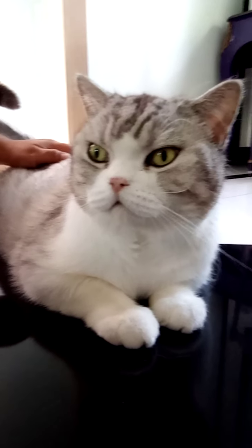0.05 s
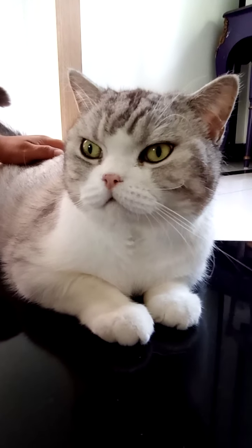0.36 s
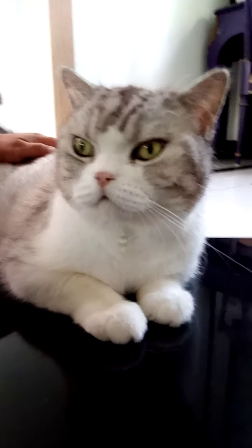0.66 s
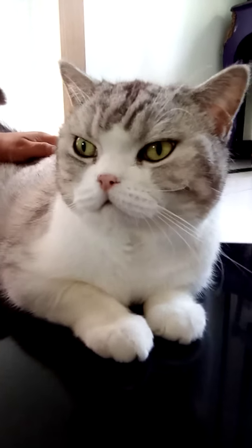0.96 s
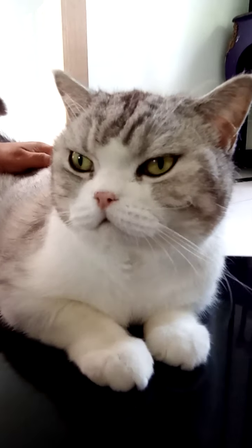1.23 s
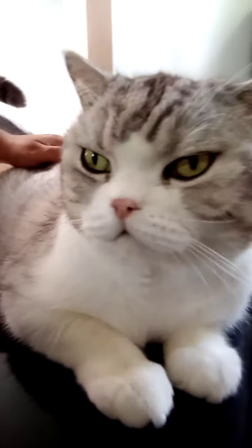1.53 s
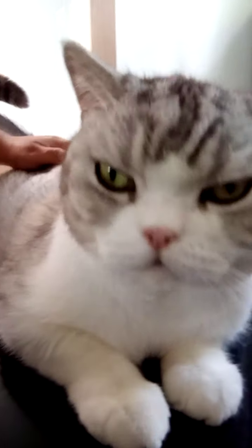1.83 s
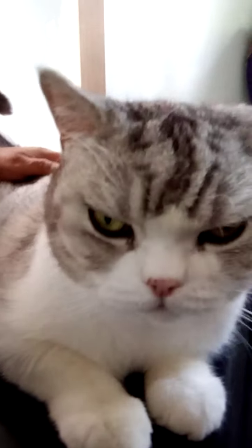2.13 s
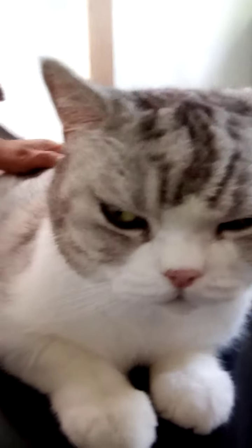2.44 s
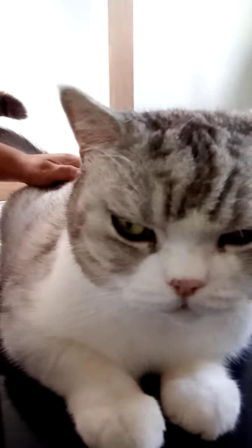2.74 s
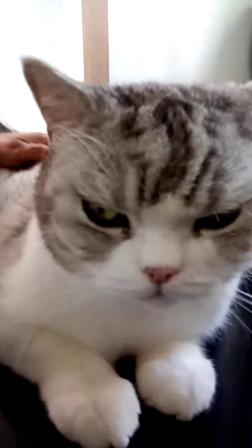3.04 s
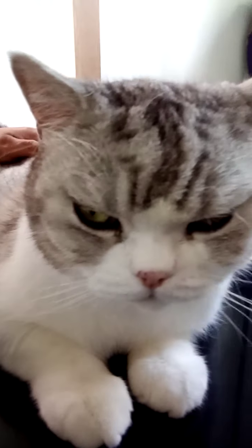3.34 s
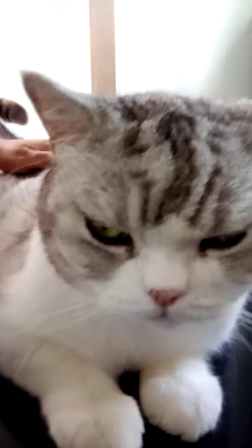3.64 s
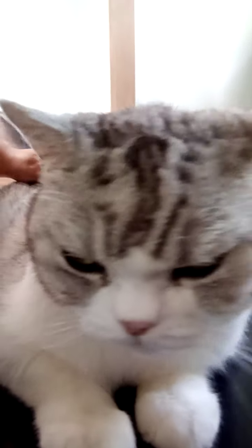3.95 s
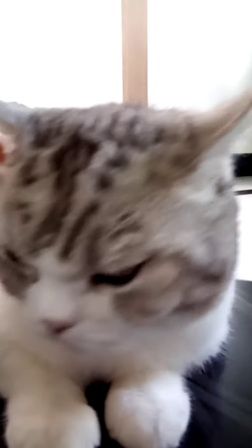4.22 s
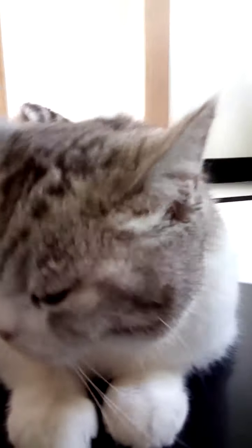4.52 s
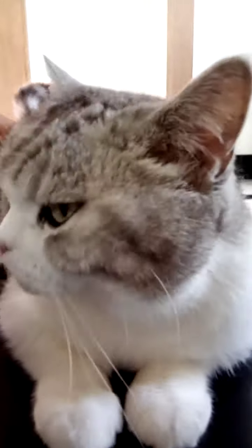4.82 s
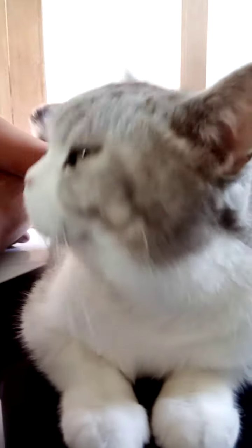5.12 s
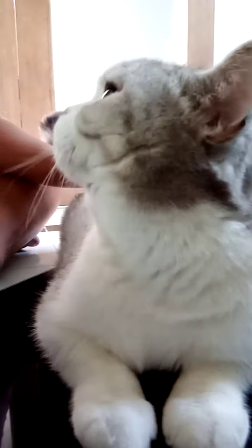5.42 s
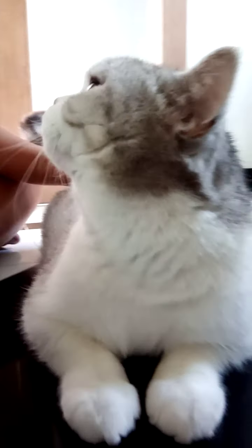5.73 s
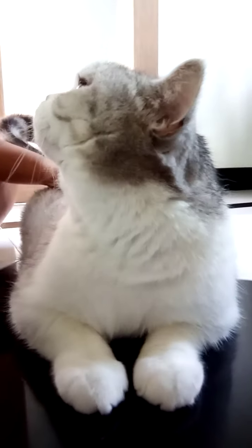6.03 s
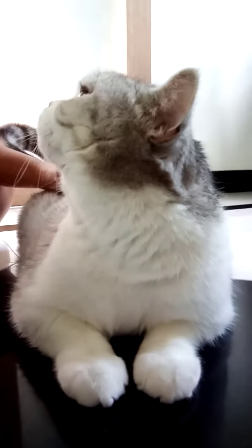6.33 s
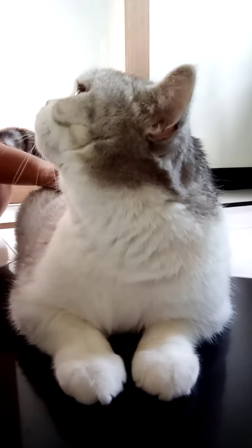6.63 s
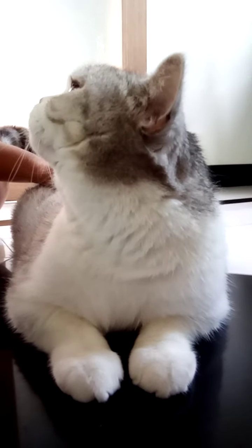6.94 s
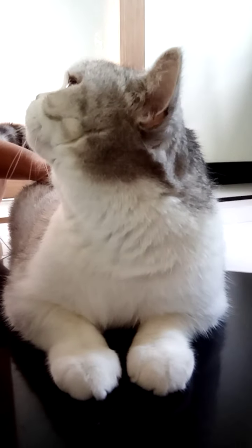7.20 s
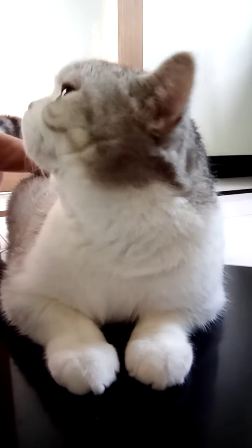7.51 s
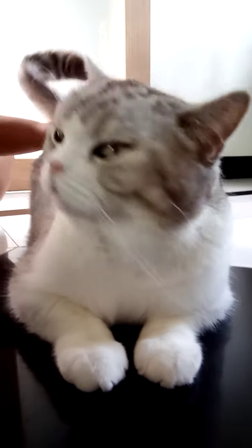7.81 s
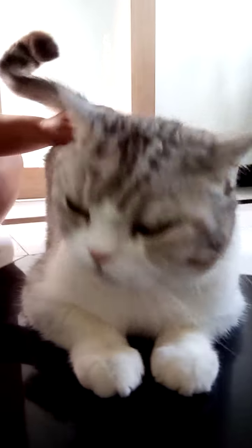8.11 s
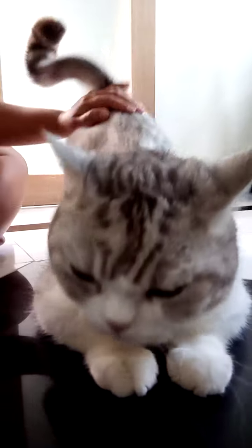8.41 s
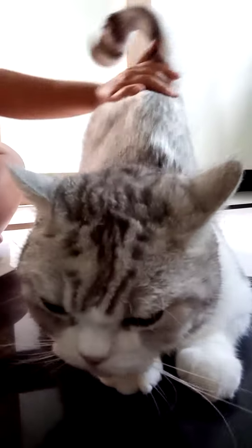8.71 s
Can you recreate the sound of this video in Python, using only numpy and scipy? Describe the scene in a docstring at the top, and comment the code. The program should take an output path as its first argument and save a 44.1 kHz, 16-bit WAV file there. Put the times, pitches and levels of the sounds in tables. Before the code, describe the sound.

Close hissing strokes over fur, with small clicks and bumps, cover a cat's faint purring and a brief run of whistling sniffs.

```python
"""In a quiet, faintly humming room a cat purrs in and out, with a pulsing nose hiss on each out-breath.
A hand starts stroking it, and fur and skin brush right against the right microphone port: each stroke
is a hiss of countless tiny slips, with sharp ticks and soft bumps where the contact catches.
Near 5.7 s the cat lifts its head and sniffs with a thin whistle, and purr and strokes pause.
From 7.7 s come one last light stroke and one more breath of purring."""
import sys
import numpy as np
from scipy import signal
from scipy.fft import rfft, irfft, next_fast_len
from scipy.io import wavfile

SR = 44100
rng = np.random.default_rng(int(sys.argv[2]) if len(sys.argv) > 2 else 0)


def store_pcm(level_fs):
    """Save levels as 16-bit WAV."""
    pcm = np.round(np.clip(level_fs, -1, 1) * 32767).astype(np.int16)
    wavfile.write(sys.argv[1], SR, np.atleast_2d(pcm).T)


N = 390726


def from_db(db):
    """Decibels to gain."""
    return 10 ** (np.asarray(db) / 20)


def rms_one(x):
    """Scale to an rms of 1."""
    return x / np.sqrt(np.mean(x ** 2) + 1e-20)


def seconds():
    """The time of every sample."""
    return np.arange(N) / SR


def at_hz(points, hz):
    """Read an EQ curve on a log-frequency axis."""
    point_hz, value = np.transpose(points)
    return np.interp(np.log(hz + 1), np.log(point_hz), value)


def equalise(x, gain):
    """Filter by a gain given as a function of frequency."""
    size = next_fast_len(N)
    hz = np.arange(size // 2 + 1) * SR / size
    return irfft(rfft(x, size) * gain(hz), size)[..., :N]


def drift(rate_hz):
    """Smooth random modulation with an rms of 1."""
    return rms_one(equalise(rng.standard_normal(N), lambda f: 1 / (1 + (f / rate_hz) ** 2)))


def resonate(x, hz, width_hz):
    """A two-pole resonance applied twice, for steep skirts; gain 1 at the peak."""
    r = np.exp(-np.pi * width_hz / SR)
    b = (1 - r * r) / 2 * np.array([1, 0, -1])
    a = [1, -2 * r * np.cos(2 * np.pi * hz / SR), r * r]
    return signal.lfilter(b, a, signal.lfilter(b, a, x + 1e-18))


def cavity(x, modes):
    """Parallel resonances with alternating polarity; rms 1."""
    rings = [(-1) ** k * from_db(db) * resonate(x, hz, width) for k, (hz, width, db) in enumerate(modes)]
    return rms_one(sum(rings))


def reverberate(x, t60_s, wet_db):
    """Direct sound plus a diffuse tail, unrelated at the two ports."""
    t = np.arange(SR // 2) / SR
    tails = rng.standard_normal((2, len(t))) * from_db(-60 * t / t60_s)
    tails *= from_db(wet_db) / np.sqrt(np.sum(tails ** 2, axis=1, keepdims=True))
    wet = signal.fftconvolve(x[None], tails, axes=1)[:, :N]
    return (x + wet) / np.sqrt(1 + from_db(wet_db) ** 2)


# EQ of the room tone: frequency_hz, gain_db
ROOM_EQ = [(25, -26.5), (52, -25), (75, -6.5), (95, -6.5), (125, -1.5), (220, -2), (400, -7.5), (600, -10),
           (1000, -14.5), (2000, -24.5), (4000, -31.5), (7000, -32.5), (13000, -49.5), (15300, -30.5)]
# Its lean to the right: frequency_hz, left_minus_right_db
ROOM_PAN = [(60, -7), (200, -7.5), (400, -11), (650, -18.5), (1300, -16), (2400, -6.5), (15000, -8.5)]
# Its width, mono in the bass and open above: frequency_hz, left_right_correlation
ROOM_CORRELATION = [(60, 1), (130, 0.82), (290, 0.67), (640, 0.22), (1400, 0), (3000, 0)]
def room_tone(level_db=-58.5, swell_db=2.4, hum_hz=94.5, hum_db=-70.5):
    """A soft, swelling rumble of air with a faint appliance hum, shared by both ports in the bass."""
    common, left_only = rng.standard_normal((2, N))
    right_eq = lambda f: from_db(at_hz(ROOM_EQ, f))
    left_eq = lambda f: right_eq(f) * from_db(at_hz(ROOM_PAN, f))
    alike = lambda f: at_hz(ROOM_CORRELATION, f)
    right = equalise(common, right_eq)
    left = equalise(common, lambda f: left_eq(f) * alike(f))
    left += equalise(left_only, lambda f: left_eq(f) * np.sqrt(1 - alike(f) ** 2))
    hum = from_db(hum_db) * np.sin(2 * np.pi * hum_hz * seconds() + drift(1.2))
    air = np.array([left, right]) / np.std(right) * from_db(level_db + swell_db * drift(5.3))
    return air + hum * from_db([[at_hz(ROOM_PAN, hum_hz)], [0]])


# Breaths of the purr, in and then out: start_s, turn_s, end_s, throat_db, nose_db
PURR_BREATHS = [(0.102, 0.78, 1.33, -63.5, -59), (1.448, 2.124, 2.67, -60, -57.5),
                (2.758, 3.5, 4.0, -60, -59), (4.099, 4.794, 5.2, -60.5, -63),
                (5.299, 5.753, 6.1, -64.5, -59), (7.776, 8.298, 8.74, -62.5, -60.5)]
# Warm resonances of chest and throat: centre_hz, width_hz, gain_db
CHEST_MODES = [(92, 29, 2.5), (144, 66, 5.5), (236, 190, -2.5), (397, 107, 0.5), (804, 290, -15.5)]
# Airy resonances of the nose: centre_hz, width_hz, gain_db
NOSE_MODES = [(895, 780, -5), (1600, 510, -22), (2670, 700, 0.5), (3080, 1600, -5.5), (4560, 1600, -5),
              (5440, 910, -1), (7730, 1200, -24.5)]
def purr(in_pulse_hz=24.2, out_pulse_hz=26.0, rest_s=0.1, fade_s=0.053, uneven_db=2.3,
         snap=29.0, puff_t60_s=0.04, click_db=-15, spurt_t60_s=0.038, steady_air=0.313):
    """Each opening of the glottis thumps the chest and, breathing out, spurts air through the nose."""
    throat, nose = np.zeros((2, N))
    halves = []
    for start, turn, end, throat_db, nose_db in PURR_BREATHS:
        # breathing in, the nose is almost silent; breathing out, the throat is softer
        halves.append((start, turn - rest_s - start, in_pulse_hz, throat_db, nose_db - 32))
        halves.append((turn, end - turn, out_pulse_hz, throat_db - 3, nose_db))
    for start, length, pulse_hz, throat_db, nose_db in halves:
        t = np.arange(int(length * SR)) / SR
        span = slice(int(start * SR), int(start * SR) + len(t))
        pulse = (t * pulse_hz).astype(int)
        since_opening = t - pulse / pulse_hz
        openings = np.diff(pulse, prepend=0)
        strength = from_db(uneven_db * rng.standard_normal(SR // 100))[pulse]
        fade = np.clip(np.minimum(t, length - t) / fade_s, 0, 1)
        throat_air, nose_air = rng.standard_normal((2, SR))[:, :len(t)]
        # each puff dies before the next, so the pulses stay distinct
        thumps = snap * openings + throat_air * from_db(-60 * since_opening / puff_t60_s)
        spurts = nose_air * (steady_air + strength * from_db(-60 * since_opening / spurt_t60_s))
        clicks = rms_one(resonate(openings * strength * fade, hz=648, width_hz=1000))
        chest = cavity(thumps * strength * fade, CHEST_MODES)
        throat[span] += from_db(throat_db) * (chest + from_db(click_db) * clicks)
        nose[span] += from_db(nose_db) * cavity(spurts * fade, NOSE_MODES)
    return throat, nose


# Partials of the nose whistle: harmonic_number, gain_db
WHISTLE_PARTIALS = [(1, -3), (2, -8.5), (3, -17)]
def sniffs(start_s=5.706, count=9, every_s=0.1175, length_s=0.147, settle_s=0.33, fall=0.0345,
           rasp=0.058, shimmer_db=5.0, attack_s=0.0071, fade_db_per_s=34.0, uneven_db=4.7):
    """Each sniff whistles in the nose and sinks a little; turbulence makes the note harsh."""
    # the run starts low and hoarse, then settles: pitch_hz, level_db, roughness
    hoarse, settled = np.array([2830, -54, 1.03]), np.array([3080, -57, 0.49])
    out, waver, shimmer = np.zeros(N), drift(580), drift(270)
    t = np.arange(int(length_s * SR)) / SR
    envelope = np.minimum(t / attack_s, 1) * np.sqrt(1 - t / length_s) * from_db(-fade_db_per_s * t)
    for elapsed in every_s * np.arange(count):
        hz, db, roughness = settled + (hoarse - settled) * np.exp(-elapsed / settle_s)
        onset = int((start_s + elapsed) * SR)
        span = slice(onset, onset + len(t))
        pitch_hz = hz * (1 + fall * (.5 - t / length_s) + rasp * roughness * waver[span])
        phase = 2 * np.pi * np.cumsum(pitch_hz) / SR
        tone = sum(from_db(gain_db) * np.sin(round(k) * phase) for k, gain_db in WHISTLE_PARTIALS)
        whistle = rms_one(tone * envelope * from_db(shimmer_db * shimmer[span]))
        out[span] += from_db(db + uneven_db * rng.standard_normal()) * whistle
    return out


# Soft bumps and scuffs of the hand: start_s, level_db, centre_hz, t60_s
HAND_BUMPS = [(0.605, -46.5, 563, 0.055), (0.925, -54, 460, 0.077), (1.425, -43.5, 1700, 0.044),
              (1.683, -43.5, 1530, .05), (4.297, -45, 2054, 0.11), (5.768, -43.5, 500, 0.034),
              (5.768, -26, 6600, 0.019), (6.025, -51, 890, 0.18), (6.747, -35.5, 670, 0.0099),
              (8.02, -59.5, 62, .5)]
def bumps():
    """The hand nudges the housing: a short burst without a pitch."""
    out, t = np.zeros(N), np.arange(SR // 3) / SR
    for start_s, db, hz, t60_s in HAND_BUMPS:
        burst = rms_one(resonate(rng.standard_normal(len(t)), hz, width_hz=hz))
        onset = int(start_s * SR)
        out[onset:onset + len(t)] += from_db(db - 60 * t / t60_s) * burst
    return out


# Sharp catches of the contact: time_s, snap_db, fizz_over_snap_db
CATCHES = [(0.585, -48, 2), (0.5971, -35, 5), (0.6066, -35, -3), (0.611, -20, -5), (1.412, -25, -9),
           (2.781, -29, -19), (2.84, -36, -18), (3.2077, -18.5, -27.5), (3.512, -14.5, -32),
           (4.349, -17, -20), (4.4221, -19, -20), (5.057, -28, -22), (5.456, -23.5, -7), (6.608, -49, 32),
           (6.6152, -22, -26), (6.7475, -19.5, -20), (6.9582, -47.5, -14), (7.2473, -48, -7),
           (7.3569, -48, -7)]
# The port's four resonances (knock, body, snap, fizz): centre_hz, width_hz
PORT_MODES = [(1600, 1700), (3600, 3300), (7200, 3700), (15100, 1700)]
def ticks(trim_db=1.0, lead_s=0.00027, body_offset_db=-7.5, body_per_fizz=0.44, knock_offset_db=-6.0):
    """A catch is one click into the port's short resonances; more fizz brings more body."""
    time_s, snap_db, fizz_db = np.transpose(CATCHES)
    body_db = snap_db + body_offset_db + body_per_fizz * fizz_db
    peaks_db = [body_db + knock_offset_db, body_db, snap_db, snap_db + fizz_db]
    onsets = np.round((time_s - lead_s) * SR).astype(int)
    out = np.zeros(N)
    for k, ((hz, width_hz), peak_db) in enumerate(zip(PORT_MODES, peaks_db)):
        clicks = np.zeros(N)
        clicks[onsets] = from_db(peak_db + trim_db)
        ring_peak = np.abs(resonate(signal.unit_impulse(SR // 100), hz, width_hz)).max()
        out += (-1) ** k * resonate(clicks, hz, width_hz) / ring_peak
    return out


# One envelope per stroke, from landing to lift-off: time_s, hiss_db, fizz_over_hiss_db
STROKE_ENVELOPES = [
    [(0.722, -39.5, -5.5), (0.906, -35, -7.5), (1.182, -39.5, -4), (1.208, -35.5, -8.5),
     (1.526, -34.5, -4.5), (1.702, -37.5, -8), (1.858, -46.5, -6.5), (1.924, -43, -6), (2.208, -59.5, 2),
     (2.31, -60.5, 1)],
    [(2.375, -54, 2), (2.543, -51.5, -2), (2.573, -45.5, 0.5), (2.845, -51.5, -9), (2.869, -55.5, -12),
     (2.961, -51.5, -6), (2.97, -54.5, -6)],
    [(3.39, -51.5, -7), (3.45, -49.5, 0.5), (3.548, -39, -7), (3.702, -43.5, -8.5), (3.722, -46, -5),
     (4.126, -43, 1), (4.444, -46.5, 0.5), (4.546, -53, 1), (4.56, -54, -5)],
    [(4.655, -53.5, -3), (4.767, -44, -4), (4.843, -46, 1), (4.967, -47.5, -3), (4.975, -54, 6.5),
     (5.253, -61.5, 1.5), (5.27, -64, 3)],
    [(5.325, -48.5, -9), (5.381, -56, -6), (5.407, -45.5, -12), (5.505, -48, -5), (5.749, -37.5, -6),
     (5.811, -46, 2.5), (6.125, -53.5, 5.5), (6.165, -41, -8), (6.199, -39.5, -6), (6.229, -50, -6),
     (6.255, -48.5, -3)],
    [(7.722, -51.5, -6), (7.794, -48.5, -2.5), (8.082, -51, -2), (8.11, -55, 3.5), (8.296, -51.5, 2.5),
     (8.434, -54.5, 6.5), (8.692, -63.5, 4.5), (8.85, -60.5, 5)],
]
# Light grazes between the strokes, each one smooth swell: middle_s, length_s, hiss_db
GRAZE_SWELLS = [(0.062, 0.17, -64.5), (0.647, 0.16, -63.5), (3.255, 0.1, -64), (3.31, 0.088, -66),
                (6.807, 0.17, -76), (7.056, 0.3, -81), (7.3, 0.3, -84)]
def hand_contact(landing_s=0.038, lifting_s=0.066, graze_fizz_db=-13):
    """Envelopes of the hiss and its share of fizz, in dB: both follow the hand's speed and pressure."""
    t = seconds()
    hiss_power, fizz_power = 1e-14, 1e-16
    for stroke in STROKE_ENVELOPES:
        time_s, hiss_db, fizz_db = np.transpose(stroke)
        landing = np.clip(1 + (t - time_s[0]) / landing_s, 0, 1)
        lifting = np.clip(1 - (t - time_s[-1]) / lifting_s, 0, 1) ** 2
        hiss = landing * lifting * from_db(np.interp(t, time_s, hiss_db))
        hiss_power += hiss ** 2
        fizz_power += (hiss * from_db(np.interp(t, time_s, fizz_db))) ** 2
    for middle_s, length_s, hiss_db in GRAZE_SWELLS:
        hiss = from_db(hiss_db) * np.cos(np.pi * np.clip((t - middle_s) / length_s, -.5, .5)) ** 2
        hiss_power += hiss ** 2
        fizz_power += (hiss * from_db(graze_fizz_db)) ** 2
    return 10 * np.log10(hiss_power), 10 * np.log10(fizz_power / hiss_power)


# The colour that the port gives the rubbing, before its bands are balanced: frequency_hz, gain_db
PORT_EQ = [(330, -42.5), (450, -18.5), (580, -41.5), (1200, -26), (2000, -22.5), (3000, -15.5),
           (4000, -11.5), (5300, -7.5), (6600, -2.5), (7400, -0.5), (8700, -4.5), (10200, -6),
           (12000, -11.5), (13800, -13.5), (14700, -2), (15400, 0)]
def fur_rubbing(slips_per_s=24000, size_spread_db=4.0, flutter_db=0.06, grip_db=1.18, patchy_db=0.86,
                trim_db=4.5, ordinary_stroke_db=-47, port_top_hz=15550):
    """Hairs slip one by one; the port colours the dense clicks, and the contact shifts their balance."""
    hiss_db, fizz_db = hand_contact()
    sizes = from_db(size_spread_db * rng.standard_normal(N)) * rng.choice([-1, 1], N)
    slipping = rng.random(N) < slips_per_s / SR
    slips = sizes * slipping * from_db(flutter_db * drift(35) + grip_db * drift(8.9))
    # body rises with fizz, but pressing harder favours the hiss
    body_db = -8.5 + 0.4 * fizz_db - 0.25 * (hiss_db - ordinary_stroke_db)
    # a lighter contact lifts the upper hiss along with the fizz
    sheen_db = -3.5 + 0.58 * fizz_db
    bands = [(300, 5000, body_db), (5000, 8400, 0), (8400, 11000, sheen_db), (11000, 20000, fizz_db)]
    highpass = lambda f, hz: 1 / (1 + (hz / (f + 1)) ** 12)
    port = lambda f: from_db(at_hz(PORT_EQ, f)) / (1 + (f / port_top_hz) ** 200)
    rub = np.zeros(N)
    for low_hz, high_hz, band_db in bands:
        band = equalise(slips, lambda f: port(f) * (highpass(f, low_hz) - highpass(f, high_hz)))
        rub += from_db(band_db + patchy_db * drift(47)) * rms_one(band)
    return from_db(hiss_db + trim_db) * rub


def scene(touch_left_db=-57.0, cat_left_db=-8.5, right_lag_s=0.00114):
    """The touch barely reaches the left port; airborne sound reaches it weaker but a little earlier."""
    touch = (fur_rubbing() + ticks() + bumps()) * from_db([[touch_left_db], [0]])
    throat, nose = purr()
    cat = throat + reverberate(nose + sniffs(), t60_s=0.32, wet_db=8.5)
    left, right = cat * from_db([[cat_left_db], [0]]) + room_tone()
    t = seconds()
    late_right = np.interp(t - right_lag_s, t, right)
    return touch + np.array([left, late_right])


def record(dry, cutoff_hz=15750):
    """A steep high cut on the whole mix."""
    return equalise(dry, lambda f: 1 / (1 + (f / cutoff_hz) ** 130))


dry = scene()
out = record(dry)
store_pcm(out)
```